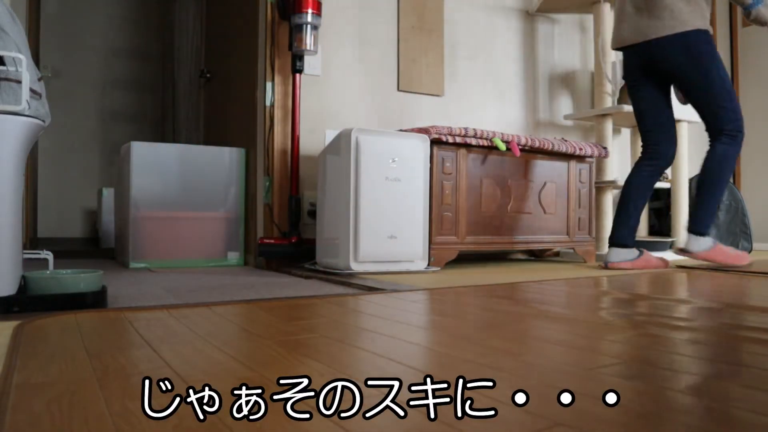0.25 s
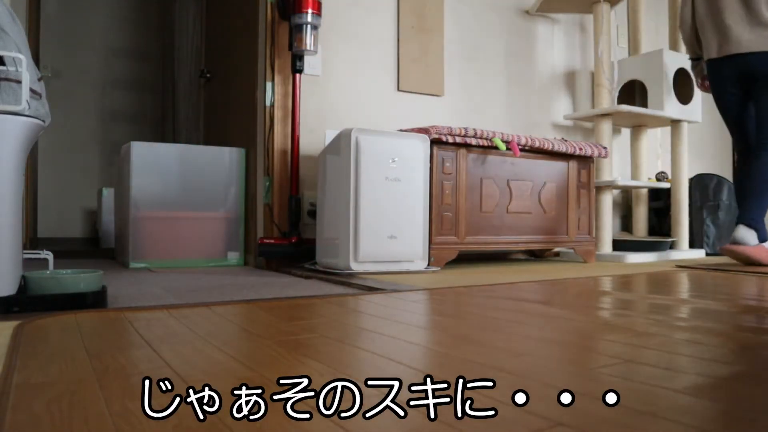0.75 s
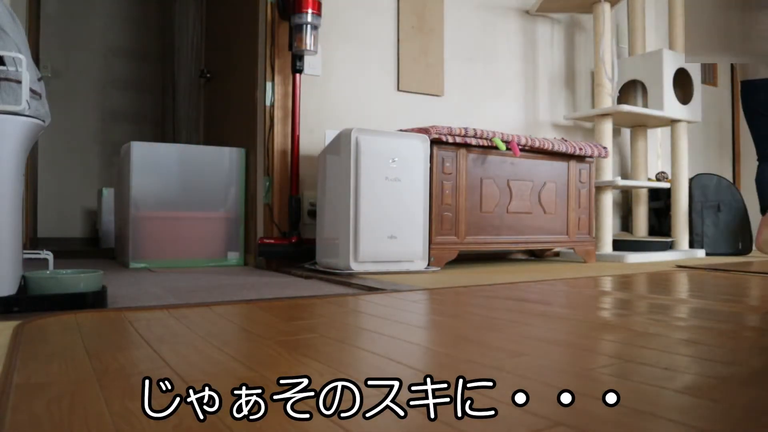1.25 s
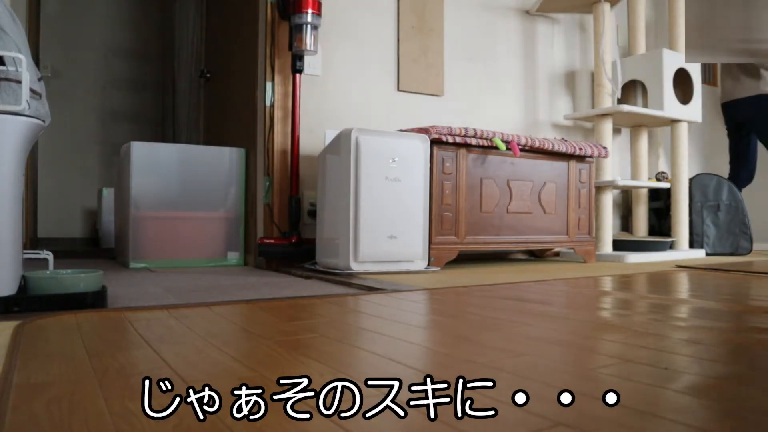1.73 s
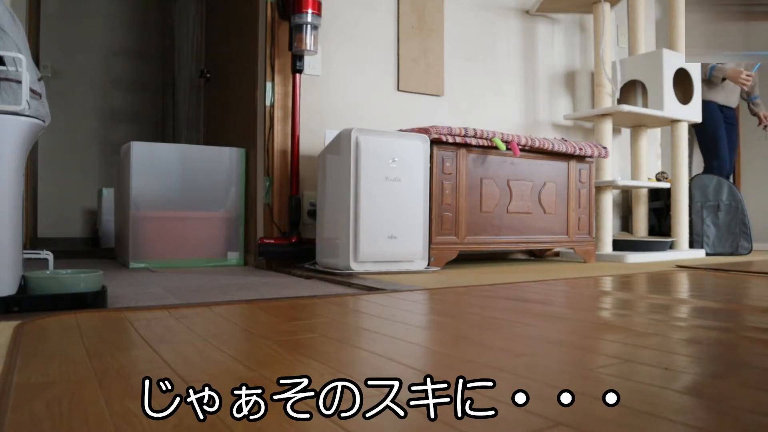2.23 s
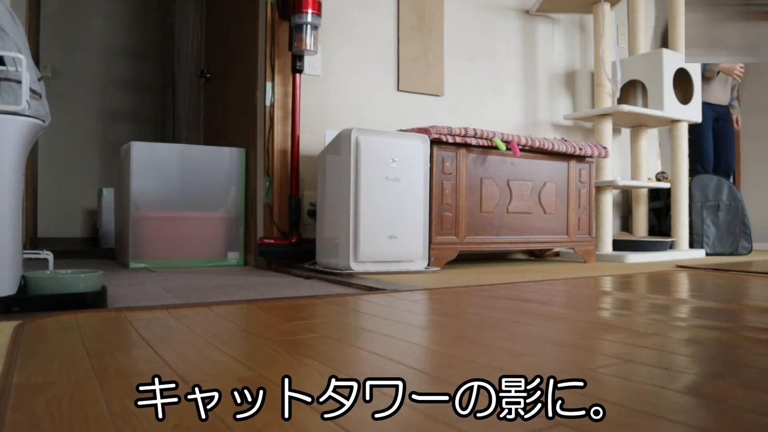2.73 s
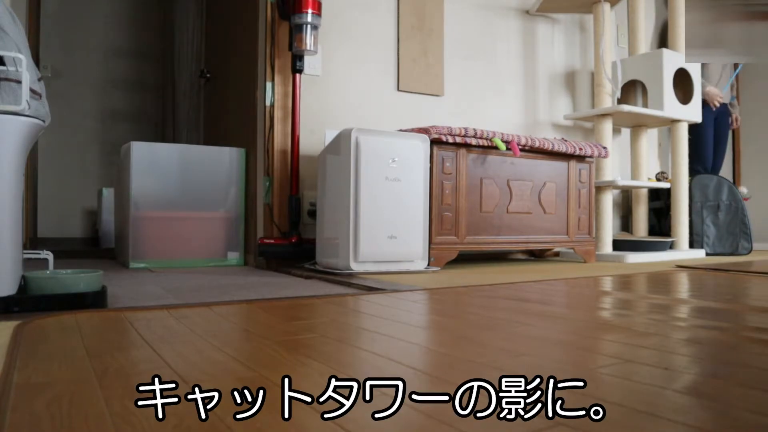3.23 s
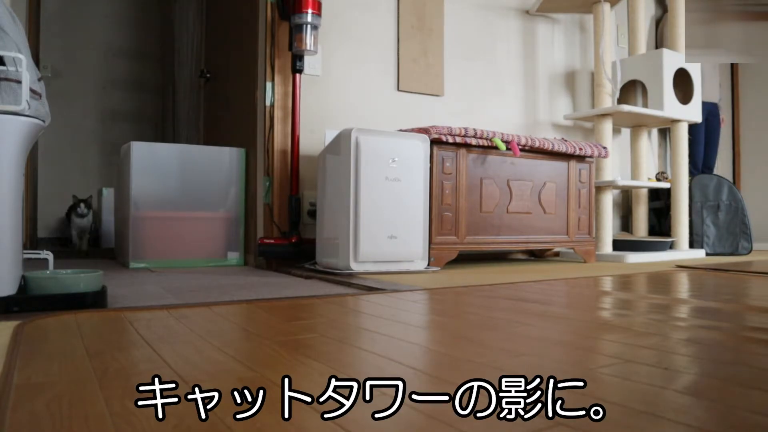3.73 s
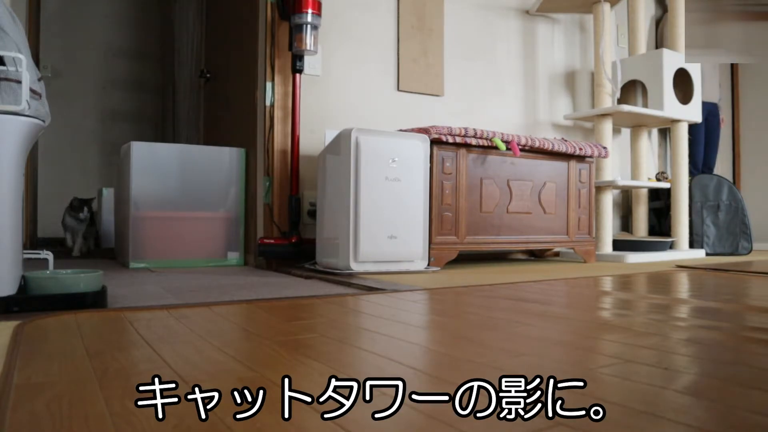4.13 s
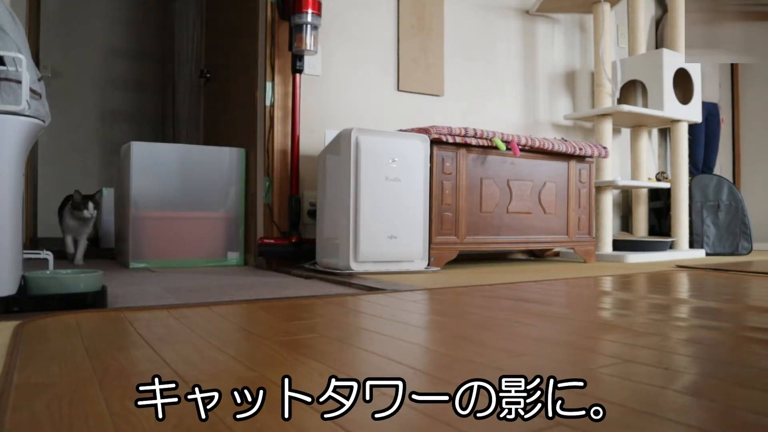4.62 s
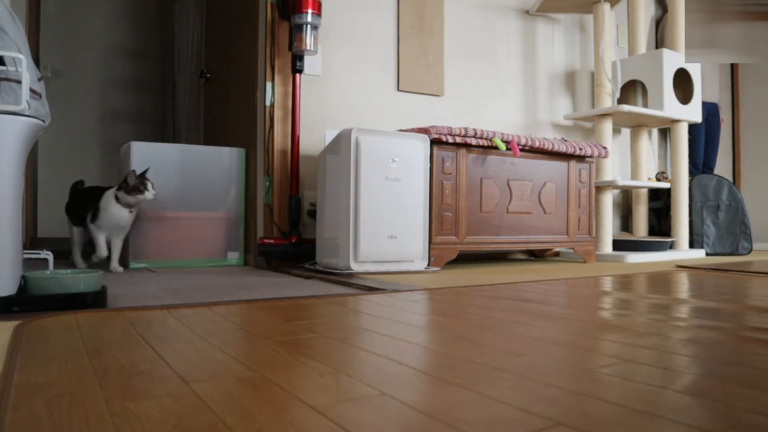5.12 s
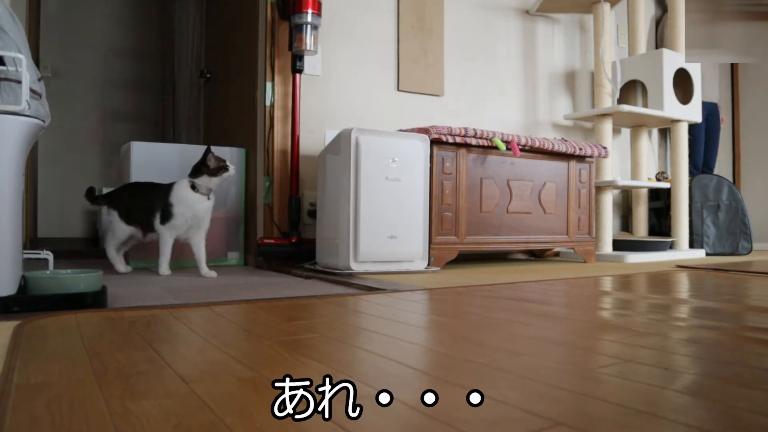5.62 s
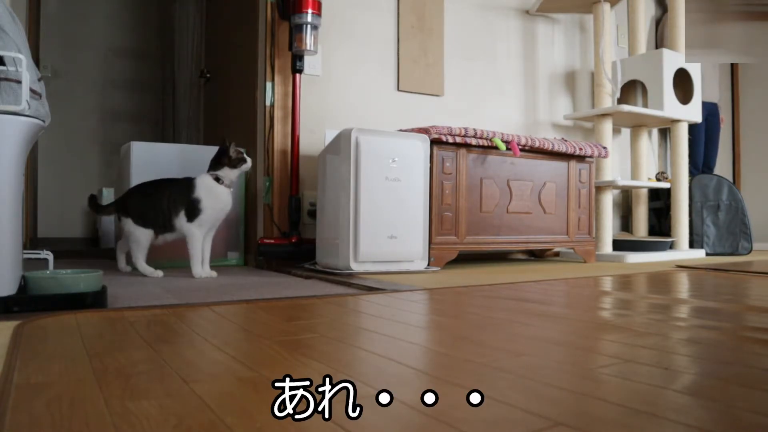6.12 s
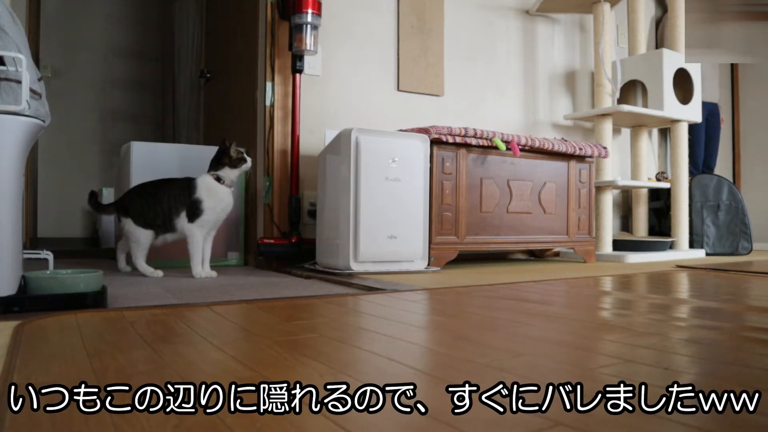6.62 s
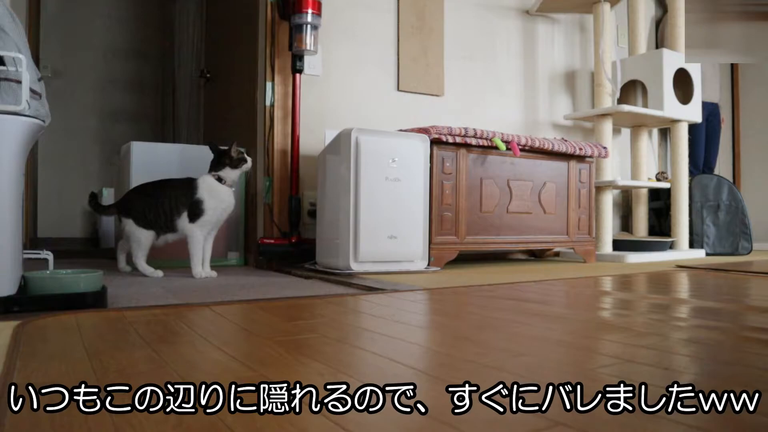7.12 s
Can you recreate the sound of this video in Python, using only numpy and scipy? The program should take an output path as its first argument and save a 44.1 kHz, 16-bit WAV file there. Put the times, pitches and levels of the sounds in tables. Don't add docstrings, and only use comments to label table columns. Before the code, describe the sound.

A steady, low fan rumble and soft air noise fill a small room, heard through close, wide stereo microphones. From 0 to about 1.2 s slippers scuff quickly on a wooden floor: airy sole rubs, soft heel landings and many tiny sharp grit snaps, strongest around 0.3 to 0.5 s. Separate softer steps come at 1.4 and 1.9 s, then the walker stops by 2.1 s. Only rumble remains until about 3.2 s, when an abrupt edit brings a slightly smeared, phasey half second with faint high bell ticks. From 4.0 to 4.3 s a cat's small, damped collar bell rattles brightly; a second, crisper cluster runs from 4.6 to 5.15 s, with one weak jingle at 5.7 s. Meanwhile a car outside swells from 4 s, peaks as a dull roar near 6.4 s, and recedes toward the end at 7.4 s.

```python
import sys
import numpy as np
from scipy import signal
from scipy.fft import rfft, irfft, next_fast_len
from scipy.io import wavfile
from scipy.ndimage import uniform_filter1d

SR = 44100
rng = np.random.default_rng(int(sys.argv[2]) if len(sys.argv) > 2 else 0)


def persist_wave(psi):
    counts = np.round(np.clip(psi, -1, 1) * 32767).astype(np.int16)
    wavfile.write(sys.argv[1], SR, np.atleast_2d(counts).T)


def voltage_ratio(level):
    return 10 ** (np.asarray(level, float) / 20)


N = 324576

# (time [s], rub level [dB], hold [s], fizz over rub [dB])
SLIDES = [(0, -49, 0.0038, -4), (0.068, -45.5, 0.07, -18), (0.124, -38.5, 0.004, -0.5),
          (0.175, -46.5, 0.035, -34), (0.288, -53.5, 0.035, -2), (.34, -51, 0.076, -11),
          (0.429, -46.5, 0.087, -11.5), (0.562, -39.5, 0.034, -6), (0.652, -41, 0.0068, -11),
          (.72, -46.5, 0.074, -8), (0.87, -48.5, 0.0078, -7), (0.981, -53.5, 0.0089, -2.5),
          (1.139, -44.5, 0.035, -8.5), (1.374, -48, .045, -7), (1.866, -45.5, .02, -9),
          (1.914, -54.5, 0.019, -0.5)]
# (frequency [Hz], level [dB per Hz])
RUB_SPECTRUM = [(600, -35), (1200, -7), (2100, -3), (3000, -3.5), (3800, -1), (4500, -3.5), (6000, -8.5),
                (9000, -29), (14000, -40)]
# (frequency [Hz], level [dB per Hz])
FIZZ_SPECTRUM = [(4000, -15), (6500, -2), (9000, -5.5), (11500, -2.5), (13000, -11.5), (15500, -31)]
# (time [s], peak level [dB])
GRIT_SNAPS = [(.1215, -27), (.1372, -28), (.1411, -23), (.157, -25), (.2295, -25), (.2879, -23),
              (.302, -25), (.3105, -23), (.3135, -14), (.3213, -25), (.3268, -25), (.3571, -28),
              (.4184, -23), (.4481, -18), (.5624, -26), (.5668, -23), (.6621, -19), (.6687, -24),
              (.7079, -22), (.7308, -23), (.7976, -25), (.8735, -27), (.9903, -26), (1.0849, -33),
              (1.1551, -26), (1.3894, -26), (1.4235, -30), (1.8869, -27), (1.9007, -24)]
# (frequency [Hz], level [dB])
SNAP_SPECTRUM = [(900, -30), (2500, -1), (4000, 5), (8000, -3.5), (12000, -6), (15000, -20)]
# (time [s], level [dB], centre [Hz], length [s])
SOFT_CONTACTS = [(0.086, -45.5, 1210, 0.057), (0.153, -43, 2100, 0.051), (.199, -41, 2200, .033),
                 (0.361, -41.5, 874, 0.035), (0.419, -42, 1190, 0.036), (0.571, -41, 1500, 0.019),
                 (1.39, -35.5, 395, 0.015), (1.382, -36.5, 734, 0.032), (1.903, -39.5, 1097, 0.026),
                 (2.2, -73, 10000, 0.036), (2.84, -70, 7960, 0.099), (1.895, -40, 1930, .035),
                 (1.933, -47, 2000, 0.03), (2.02, -59, 1000, 0.016), (3.367, -65, 11000, .02),
                 (3.41, -60, 11500, .02), (3.411, -56, 5500, .006), (0.584, -44, 3900, 0.037),
                 (0.715, -45, 3600, 0.063), (1.152, -55, 4100, .06), (1.39, -55, 4800, 0.068),
                 (3.451, -43, 3600, .012), (3.455, -49, 8500, .01), (3.587, -62, 10000, 0.023),
                 (6.545, -62, 8000, .012), (6.75, -86, 11500, 0.045), (7.23, -73, 11000, 0.08)]
# (time [s], first strike level [dB], settling [dB/s])
BELL_JOLTS = [(3.3988, -49.5, 300), (3.4861, -54, 200), (3.959, -42, 100), (3.9917, -42, 100),
              (4.0179, -19.5, 300), (4.0644, -30, 350), (4.1348, -26.5, 250), (4.193, -30, 300),
              (4.2051, -28.5, 300), (4.2389, -23, 200), (4.2467, -24, 200), (4.4672, -49, 60),
              (4.5777, -47, 50), (4.636, -24, 1500), (4.653, -41, 60), (4.6985, -24, 3000),
              (4.7105, -18, 500), (4.7486, -19, 1500), (4.7628, -25.5, 354), (4.9007, -35, 2500),
              (4.935, -26, 3000), (4.941, -14.5, 300), (4.9748, -22, 1200), (5.0087, -17.5, 1500),
              (5.0176, -34.5, 200), (5.0506, -45, 200), (5.1258, -45, 300), (5.137, -38, 596),
              (5.718, -34, 500)]
# (time [s], peak level [dB])
MORE_STRIKES = [(3.235, -47), (3.255, -54), (3.282, -50), (3.296, -42), (3.385, -52), (3.395, -36),
                (3.405, -24.5), (3.415, -54), (3.49, -30), (3.519, -25.5), (3.527, -45), (3.545, -38),
                (3.555, -51), (3.61, -59), (3.697, -50), (3.907, -50), (4.558, -49), (5.431, -54)]
# (frequency [Hz], width [Hz], level [dB])
SHELL_MODES = [(7430, 105, -8), (7550, 28, 4), (7624, 130, 1.5), (8000, 200, -12), (11100, 700, -11)]
# (frequency [Hz], level [dB])
CLICK_SPECTRUM = [(5000, -30), (8000, -5), (11300, 0), (13000, -8), (15500, -26)]
# (frequency [Hz], level [dB per Hz])
FAN_SPECTRUM = [(12, -37), (20, -12.5), (48, -10), (70, -3.5), (97, -5.5), (124, 4), (140, -1.5),
                (166, -5.5), (225, 1), (259, -6), (279, -4.5), (302, -18), (321, -8), (365, -20),
                (420, -17), (550, -33.5), (920, -120)]
# (frequency [Hz], level [dB per Hz])
AIR_SPECTRUM = [(220, -1.5), (380, -7.5), (472, -4), (526, -2.5), (675, -6), (741, -4), (1180, -9),
                (1340, -9.5), (3840, -22.5), (10800, -45), (15500, -54.5)]
# (frequency [Hz], level [dB per Hz])
CAR_SPECTRUM = [(45, -6), (78, 17), (110, -27), (350, -19), (550, -7.5), (850, 3), (1200, -5), (1700, -5.5),
                (2400, -6.5), (2750, -17), (4500, -28), (7000, -66)]
# (time [s], level [dB])
CAR_PASS = [
    (0, -52.5),
    (3.2, -55),
    (4.0, -48),
    (4.8, -44),
    (5.9, -39),
    (6.45, -38.5),
    (6.8, -43),
    (7.36, -44.5),
]
# (frequency [Hz], t60 [s])
WALL_DECAY = [(300, 0.16), (3000, 0.27), (8000, 0.41), (14000, 0.076)]
# (frequency [Hz], side minus mid [dB])
PAIR_WIDTH = [(60, -56), (110, -41), (200, -23), (380, -6.5), (700, -7.5), (1290, -2.5), (2380, 1.5),
              (4400, 4.5), (8120, 6), (15000, 5.5)]
# (frequency [Hz], share [0-1])
SIDE_SHARE = [(60, .3), (200, .8), (330, .7), (550, .2), (1500, .05)]

SLIDE_ATTACK_S, SLIDE_RELEASE_DB_PER_S = 0.012, 170
SWELL_DB = -3
DRAG_DB, DRAG_RELEASE_DB_PER_S, DRAG_FIZZ_DB = -14.5, 20, -2
STANDS_STILL_S, SETTLE_S = 1.99, 0.087
OFF_AXIS_DB = 1
FLOOR_ECHO_S, FLOOR_ECHO_DB = 0.0013, -4
REBOUND_S, REBOUND_SCATTER = 0.0043, 0.61
GLANCE_DB = 5.5
FIRST_TOUCH_DB = -5.5
CLICK_FROM_DB = -28
FAN_DB, AIR_DB = -31.8, -42
SHAKES_ROOM_DB = 5.5
CUT_IN_S, CUT_OUT_S = 3.18695, 3.6362


def slippers():
    rub_gain, fizz_gain = sliding()
    grain_db = 2.0 * rng.exponential(size=(2, 1, N // 40 + 1))
    grit = rng.standard_normal((2, 2, N)) * voltage_ratio(grain_db.repeat(40, axis=2)[..., :N])
    rub = rub_gain * unit(coloured(grit[0], RUB_SPECTRUM))
    fizz = fizz_gain * unit(coloured(grit[1], FIZZ_SPECTRUM))
    mid, side = rub + fizz
    soles = np.array([mid, voltage_ratio(OFF_AXIS_DB) * coloured(side, PAIR_WIDTH)])
    again = [(s + FLOOR_ECHO_S, db + FLOOR_ECHO_DB) for s, db in GRIT_SNAPS]
    snaps = voltage_ratio(-0.5) * coloured(impulses(GRIT_SNAPS + again), SNAP_SPECTRUM)
    return soles + placed(snaps, turn=-1.2, side_db=5, wet_db=-5)


def sliding():
    power = np.zeros((2, N + SR))
    t = np.arange(SR) / SR
    for s, db, hold, fizz_db in SLIDES:
        rise = np.clip(t / SLIDE_ATTACK_S, 0, 1) * voltage_ratio(db)
        lean_db = SWELL_DB * np.clip(1 - t / (hold + SLIDE_ATTACK_S), 0, 1)
        release_db = SLIDE_RELEASE_DB_PER_S * np.maximum(t - SLIDE_ATTACK_S - hold, 0)
        slide = rise * voltage_ratio(lean_db - release_db)
        drag = rise * voltage_ratio(DRAG_DB - DRAG_RELEASE_DB_PER_S * t)
        rub_power = slide ** 2 + drag ** 2
        fizz_power = (slide * voltage_ratio(fizz_db)) ** 2 + (drag * voltage_ratio(DRAG_FIZZ_DB)) ** 2
        power[:, round(s * SR):][:, :SR] += np.array([rub_power, fizz_power])
    stop = np.clip(1 - (np.arange(N) / SR - STANDS_STILL_S) / SETTLE_S, 0, 1)
    return np.sqrt(power[:, :N]) * stop


def landings():
    out = np.zeros(N + SR)
    t = np.arange(SR // 4) / SR
    hz = np.fft.rfftfreq(len(t), 1 / SR)
    for s, db, centre_hz, length in SOFT_CONTACTS:
        octaves = np.log2((hz + 1) / centre_hz)
        band = np.exp(-(octaves / 0.6) ** 2) / (1 + (hz / 13000) ** 16)
        puff = unit(irfft(rfft(rng.standard_normal(len(t))) * band, len(t)))
        shape = (1 - np.exp(-t / 0.0023)) * np.exp(-(t / length) ** 2)
        out[round(s * SR):][:len(t)] += voltage_ratio(db) * shape * puff
    return placed(out[:N], turn=-1.2, side_db=-2, wet_db=-11)


def bell():
    hard = [(s, db) for s, db, _ in BELL_JOLTS if db > CLICK_FROM_DB]
    clicks = voltage_ratio(-20) * coloured(impulses(hard), CLICK_SPECTRUM)
    strikes = ring(rattle(count=16)) + clicks
    near = placed(strikes, turn=1.1, side_db=1.5, wet_db=-13)
    return near + placed(ring(MORE_STRIKES), turn=1.1, side_db=1.5, wet_db=-20)


def rattle(count):
    s, db, settling = np.transpose(BELL_JOLTS)[..., None]
    scatter = rng.uniform(-1, 1, (len(BELL_JOLTS), count))
    flight = REBOUND_S * (1 + REBOUND_SCATTER * scatter)
    after = np.cumsum(flight, axis=1) - flight[:, :1]
    glance_db = GLANCE_DB * rng.exponential(size=after.shape) * (np.arange(count) > 1)
    graze_db = FIRST_TOUCH_DB * (after == 0)
    level = db - settling * after - glance_db + graze_db
    return np.transpose([(s + after).ravel(), level.ravel()])


def ring(strikes):
    def shell_and_slit(hz):
        shell = sum(voltage_ratio(db) * 1j * hz * width / (centre ** 2 - hz ** 2 + 1j * hz * width)
                    for centre, width, db in SHELL_MODES)
        slit = 1 / (1 + 4.5j * (hz / 7600 - 7600 / (hz + 1))) ** 2
        return shell * slit
    return voltage_ratio(22.5) * filtered(impulses(strikes), shell_and_slit)


def background():
    time, level = np.transpose(CAR_PASS)
    car = voltage_ratio(np.interp(np.arange(N) / SR, time, level))
    rumble_gain = np.hypot(voltage_ratio(FAN_DB), voltage_ratio(SHAKES_ROOM_DB) * car)
    rumble = rumble_gain * diffuse(FAN_SPECTRUM, patchy_db=-0.9)
    air = voltage_ratio(AIR_DB) * diffuse(AIR_SPECTRUM, patchy_db=0.8)
    return rumble + air + car * diffuse(CAR_SPECTRUM, patchy_db=0.5)


def diffuse(spectrum, patchy_db):
    z = signal.stft(rng.standard_normal((2, N)), nperseg=512)[2]
    patches = uniform_filter1d(rng.standard_normal(z.shape[1:]), 6, 0)
    patches = unit(uniform_filter1d(patches, 14, 1))
    noise = signal.istft(z * voltage_ratio(patchy_db * patches), nperseg=512)[1][:, :N]
    mid, other = coloured(noise, spectrum)
    late = filtered(mid, lambda hz: -1j * along(SIDE_SHARE, hz))
    free = filtered(other, lambda hz: np.sqrt(1 - along(SIDE_SHARE, hz) ** 2))
    return np.array([mid, coloured(late + free, PAIR_WIDTH)]) / np.std(mid)


def placed(x, turn, side_db, wet_db):
    out = np.array([x, filtered(x, lambda hz: np.exp(1j * turn))])
    hop = SR // 4
    for start in range(0, N, hop):
        piece = x[start:start + hop]
        if np.max(np.abs(piece)) < 1e-4:
            continue
        hz, t, z = signal.stft(rng.standard_normal((2, SR // 3)), SR, nperseg=256)
        decay = voltage_ratio(-60 * t / along(WALL_DECAY, hz)[:, None])
        tail = signal.istft(z * decay, SR, nperseg=256)[1]
        wet = signal.fftconvolve(piece[None], tail / np.linalg.norm(tail[0]), axes=1)
        seat = out[:, start + 200:start + 200 + wet.shape[1]]
        seat += voltage_ratio(wet_db) * wet[:, :seat.shape[1]]
    return np.array([out[0], voltage_ratio(side_db) * coloured(out[1], PAIR_WIDTH)])


def impulses(rows):
    s, db = np.transpose(rows)
    signs = np.sign(rng.standard_normal(len(s)))
    return np.bincount(np.round(s * SR).astype(int), voltage_ratio(db) * signs, N)


def unit(x):
    return x / np.sqrt(np.mean(x ** 2) + 1e-20)


def along(points, hz):
    f, v = np.transpose(points)
    return np.interp(np.log(hz + 1), np.log(f + 1), v)


def filtered(x, response):
    m = next_fast_len(N + SR // 2)
    return irfft(rfft(x, m) * response(np.fft.rfftfreq(m, 1 / SR)), m)[..., :N]


def coloured(x, spectrum):
    return filtered(x, lambda hz: voltage_ratio(along(spectrum, hz)))


def scene():
    mid, side = slippers() + landings() + bell() + background()
    return np.array([mid + side, mid - side])


def stretched(x, spread):
    z = signal.stft(x, nperseg=2048, noverlap=1792)[2]
    drift = uniform_filter1d(rng.standard_normal(z.shape), 3, 1)
    drift = unit(uniform_filter1d(drift, 16, 2))
    onset = np.clip(np.arange(z.shape[2]) / 5, 0, 1)
    turned = z * np.exp(1j * spread * onset * drift)
    return signal.istft(turned, nperseg=2048, noverlap=1792)[1][:, :x.shape[1]]


def roll_off(x):
    return signal.sosfilt(signal.butter(12, 15710, fs=SR, output="sos"), x)


def record(dry):
    a, b = round(CUT_IN_S * SR), round(CUT_OUT_S * SR)
    fade = np.clip((np.arange(b - a) / SR - 0.003) / 0.005, 0, 1)
    piece = voltage_ratio(-2.4) * fade * stretched(dry[:, a:b], spread=1.13)
    joined = np.concatenate([dry[:, :a], piece, dry[:, b:]], axis=1)
    mix = filtered(joined, lambda hz: hz < 15700)
    return roll_off(mix)


dry = scene()
out = record(dry)
persist_wave(out)
```